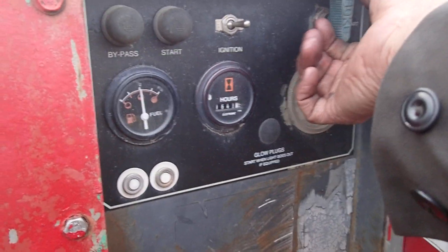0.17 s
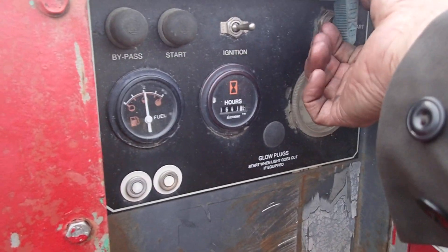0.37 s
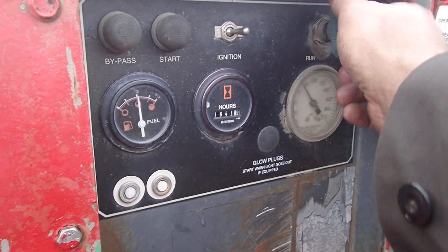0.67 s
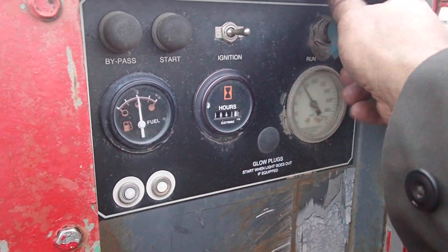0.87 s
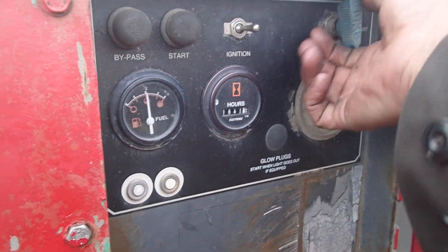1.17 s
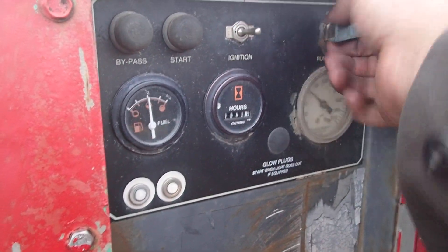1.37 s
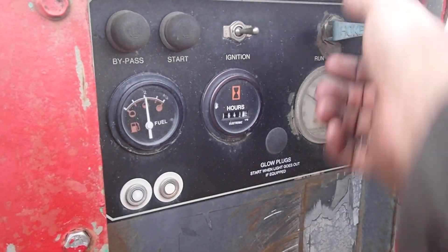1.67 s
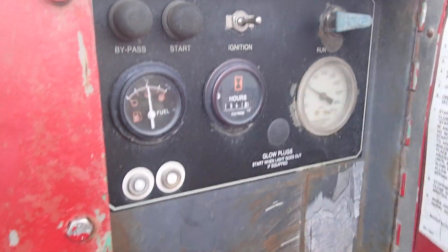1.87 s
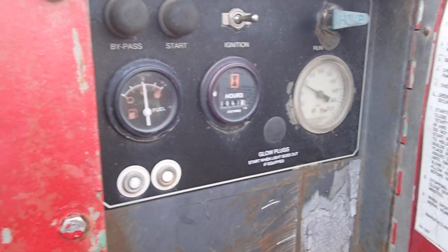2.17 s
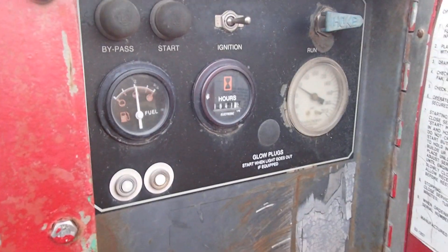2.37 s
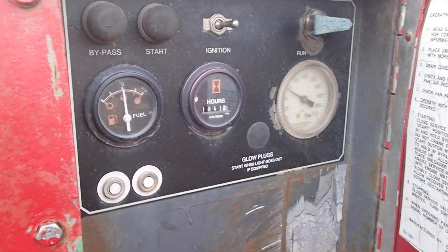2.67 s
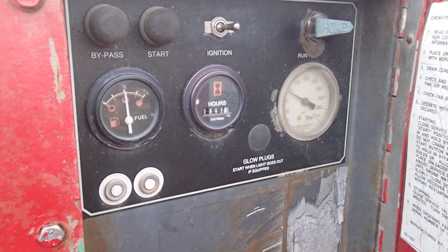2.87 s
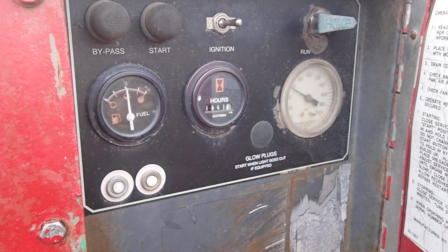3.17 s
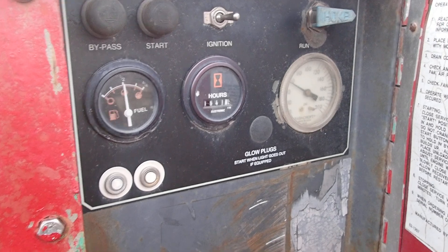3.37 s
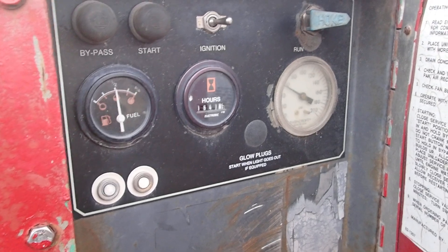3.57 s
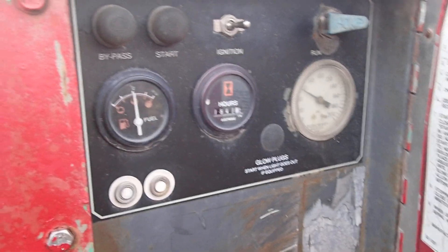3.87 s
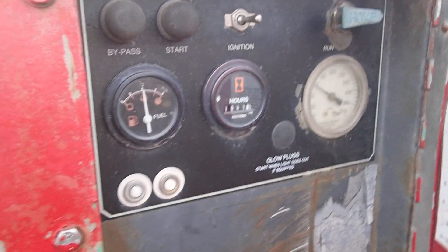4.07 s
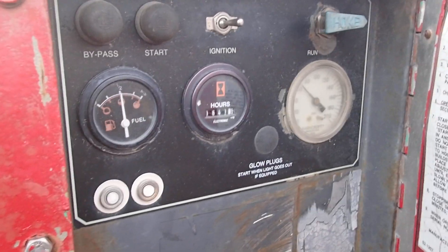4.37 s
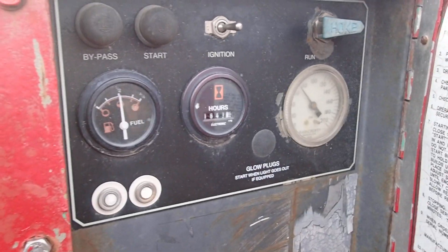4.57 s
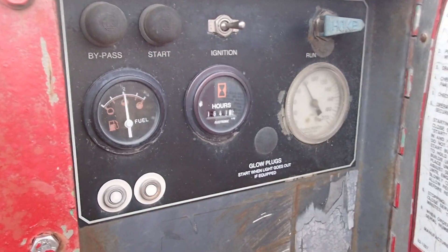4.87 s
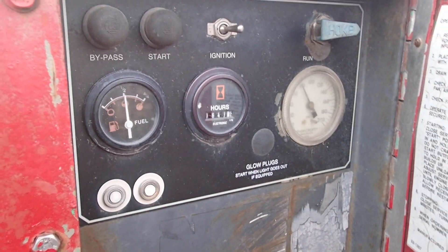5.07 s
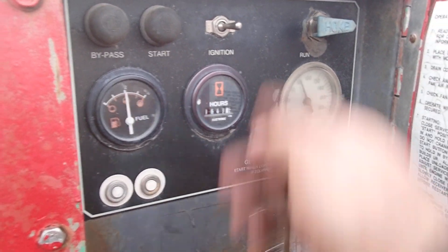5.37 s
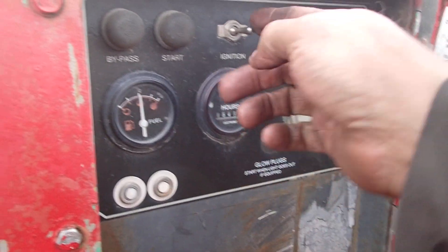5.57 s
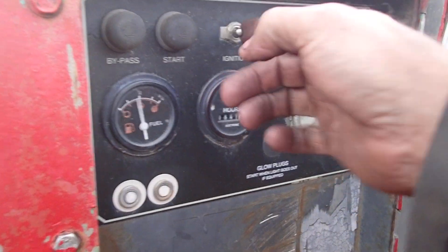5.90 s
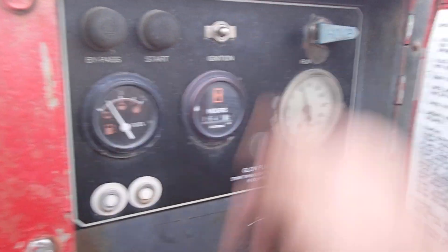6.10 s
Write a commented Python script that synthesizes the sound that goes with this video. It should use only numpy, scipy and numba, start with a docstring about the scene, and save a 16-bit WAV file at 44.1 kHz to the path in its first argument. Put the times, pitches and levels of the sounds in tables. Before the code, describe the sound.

A close, shrill blast of air over a slowing diesel engine stops abruptly, uncovering a clattering idle and a thin leak.

```python
"""A portable diesel compressor blasts air from an open valve, heard close up at its control panel.
The turbulent jet hisses and rings in the panel recess, changing colour as a hand draws back, while the
engine drops from full speed to idle. The valve shuts and the microphone's gain control brings up the
exhaust throb, cylinder clatter, screw whine and a small leak. Then the ignition is switched off and the
engine starts to coast down. The stereo microphone has two ports, the left one muffled."""
import sys
import numpy as np
from scipy import signal
from scipy.fft import rfft, irfft
from scipy.io import wavfile
from scipy.ndimage import uniform_filter1d, minimum_filter1d
from numba import njit

SR = 44100
rng = np.random.default_rng(int(sys.argv[2]) if len(sys.argv) > 2 else 0)


def wav_out(sig):
    """Save sig, one row per channel (or a flat mono array), as 16-bit PCM at SR to the path in sys.argv[1]."""
    wavfile.write(sys.argv[1], SR, np.round(np.clip(np.atleast_2d(sig).T, -1, 1) * 32767).astype(np.int16))


N = 275166
TIME = np.arange(N) / SR
FREQ = np.maximum(np.fft.rfftfreq(N, 1 / SR), 1)
TOP_HZ = 15690  # upper edge of the microphone's band
FULL_HZ, IDLE_HZ = 87, 52.21  # firings per second


def undb(db):
    """Decibels to gain."""
    return 10 ** (np.asarray(db) / 20)


def over_time(points):
    """Points joined by straight lines in time."""
    return np.interp(TIME, *np.transpose(points))


def over_freq(points):
    """Points joined by straight lines on a log-frequency axis."""
    hz, value = np.transpose(points)
    return np.interp(np.log(FREQ), np.log(hz), value)


def ease(start_s, length_s):
    """A smooth step from 0 to 1."""
    u = np.clip((TIME - start_s) / length_s, 0, 1)
    return u * u * (3 - 2 * u)


def bell(hz, width_hz):
    """Power response of one resonance."""
    return 1 / (1 + (2 * (FREQ - hz) / width_hz) ** 2)


def shape(x, gain):
    """Filter with a gain per frequency."""
    return irfft(rfft(x) * gain, N)


def causal(db):
    """Minimum-phase response with the given level per frequency."""
    cepstrum = irfft(np.log(undb(db)), N)
    return np.exp(rfft(cepstrum * (1 + np.sign(np.fft.fftfreq(N)))))


def drift(rate_hz):
    """Smooth random drift of spread 1."""
    x = shape(rng.standard_normal(N), 1 / (1 + (FREQ / rate_hz) ** 2))
    return x / x.std()


def air_noise():
    """White noise of 0 dB per Hz at both microphone ports, less alike towards the treble."""
    # likeness of the two ports: frequency_hz, correlation
    likeness = [(200, 1), (600, .97), (1200, 0.88), (2500, 0.54), (5000, 0.14), (9000, 0.16), (14000, 0.27)]
    alike = over_freq(likeness)
    own, right = rfft(rng.standard_normal((2, N)))
    left = alike * right + np.sqrt(1 - alike ** 2) * own
    return irfft(np.array([left, right]), N) * np.sqrt(SR / 2)


def noise_band(hz, width_hz):
    """Noise through one resonance, about equally strong at any width."""
    return shape(air_noise(), bell(hz, width_hz) / np.sqrt(width_hz))


def scatter(db, decay_s):
    """Response of the direct sound plus a short spray of reflections off the sheet metal."""
    tail = rng.standard_normal(N) * np.exp(-np.minimum(TIME / decay_s, 50))
    return 1 + undb(db) * rfft(tail / np.linalg.norm(tail))


def gusts(length_s=0.011, centre_hz=105, width_hz=60):
    """Short low puffs of stray air on the microphone's right port."""
    # puffs of air: peak_s, level_db
    puffs = [(.12, -19), (.43, -20.5), (.53, -11), (.92, -22)]
    swell = sum(undb(db) * np.exp(-((TIME - s) / length_s) ** 2) for s, db in puffs)
    rumble = shape(rng.standard_normal(N), bell(centre_hz, width_hz))
    return np.array([[0], [1]]) * swell * rumble / rumble.std()


def ignition_switch(start_s=5.922, level_db=-13, decay_s=0.004):
    """A faint, dry snap as the toggle goes over."""
    envelope = (TIME >= start_s) * np.exp(-abs(TIME - start_s) / decay_s)
    return noise_band(hz=6500, width_hz=3500) * undb(level_db) * envelope


def leak(ring_hz=9900, ring_width_hz=190, ring_db=6.5):
    """Escaping air: a thin hiss with a faint high ring, which stays when the valve is shut."""
    # hiss of the leak: frequency_hz, level_db
    spectrum = [(500, -61), (2500, -64.5), (3500, -61.5), (5000, -61.5), (8000, -64.5), (10500, -57.5),
                (13000, -62.5), (15500, -68.5)]
    colour = undb(over_freq(spectrum) + ring_db * bell(ring_hz, ring_width_hz))
    reflections = scatter(db=-10.5, decay_s=0.012)
    return shape(air_noise(), colour * reflections) * undb(0.5 * drift(35))


def shaft_tone(firings, multiple, smear_rad):
    """A tone of rms 1 locked to the crankshaft, its phase wandering a little."""
    phase = 2 * np.pi * (multiple * firings + rng.random())
    return np.sqrt(2) * np.sin(phase + smear_rad * drift(6.9))


def whine(firings, waver_db=2.0):
    """Wavering tones of the turning parts; the screw whine swells and fades three times, then stays low."""
    # tones of the screws, gears and fan: firing_multiple, level_db, swell_share
    tones = [(3.335, -30.5, 0.1), (5.976, -28, 0), (6.77, -31, 0), (8.95, -36, 0), (9.58, -36.5, 0.4),
             (12.04, -36.5, 0.5), (15.11, -28.5, 0.6), (17.05, -36, 0.5), (20.26, -34, 0.3), (24, -32, 0.9),
             (25.26, -38.5, 0.1), (27.04, -39, 0), (30.2, -37.5, 0.5), (33.1, -49, 0), (36.05, -39, 0),
             (42.4, -40.5, 0.3)]
    # swells of the screw whine: time_s, gain_db
    swells = [(2.2, .5), (2.65, 16), (3.3, 2), (3.9, 12), (4.4, 0.5), (4.68, 8), (5.0, -7), (5.5, -5)]
    swell_db = over_time(swells)
    out = 0
    for multiple, db, share in tones:
        gain = undb(db + share * swell_db + waver_db * drift(0.85))
        out += gain * shaft_tone(firings, multiple, smear_rad=0.53)
    return out


def clatter(firings, repeat_share=0.36, knock_depth=0.32, decay_firings=0.23, cylinder_db=0.75):
    """Four cylinders knock in turn; part of the rattle comes back the same in every engine cycle."""
    # diesel clatter in the housing: frequency_hz, level_db
    spectrum = [(30, -79), (70, -52), (120, -43.5), (165, -43), (225, -44), (320, -46.5), (620, -48.5),
                (1060, -48), (1300, -53), (1600, -54), (2200, -62), (3500, -63.5), (8000, -68.5),
                (15000, -92)]
    size = 3380  # points in one engine cycle
    pattern = irfft(np.exp(2j * np.pi * rng.random(size // 2 + 1)))
    cycle = np.interp(firings / 4 % 1 * size, np.arange(size), pattern / pattern.std()) * np.sqrt(SR / 2)
    rattle = np.sqrt(repeat_share) * cycle + np.sqrt(1 - repeat_share) * air_noise()
    knocks = 1 + knock_depth * np.exp(-(firings % 1) / decay_firings)
    beat = knocks * undb(cylinder_db * np.sin(np.pi * firings))  # strong and weak firings alternate
    return shape(rattle * beat / np.sqrt(np.mean(beat ** 2)), undb(over_freq(spectrum)))


def exhaust(firings, firing_hz, burn_db, muffler_hz=115, muffler_db_per_octave=14):
    """The deep throb of the firings through the muffler; it collapses when the fuel is cut."""
    # exhaust and block tones: firing_multiple, level_db, burn_share
    tones = [(1, -23.5, 0.55), (1.751, -28.5, 0.9), (2, -14.5, 1), (2.999, -33, 0)]
    out = 0
    for multiple, db, share in tones:
        muffled_db = muffler_db_per_octave * np.maximum(np.log2(multiple * firing_hz / muffler_hz), 0)
        gain = undb(db + share * burn_db - muffled_db + 0.45 * drift(3.1))
        out += gain * shaft_tone(firings, multiple, smear_rad=0.026)
    return out


def governor(off_s=5.95, coast_hz_per_s=36):
    """Firing rate and fuel cut (0-1): starved of fuel the engine sinks to idle; switched off, it coasts."""
    slowed = ease(start_s=1.33, length_s=0.67)  # the throttle is eased back
    caught = ease(start_s=1.66, length_s=0.45)  # fuel returns as idle nears
    coasted_hz = coast_hz_per_s * np.maximum(TIME - off_s, 0)
    firing_hz = FULL_HZ + (IDLE_HZ - FULL_HZ) * slowed - coasted_hz
    return firing_hz, slowed * (1 - caught) + ease(off_s, length_s=0.16)


def engine():
    """The diesel and the screws it drives: speed and fuel set the throb, whine and clatter."""
    firing_hz, fuel_cut = governor()
    octaves = np.log2(firing_hz / IDLE_HZ)
    firings = np.cumsum(firing_hz * (1 + 0.000987 * drift(2.83))) / SR
    burn_db = 0.56 - 8 * octaves - 17.5 * fuel_cut
    whine_db = 2 + 5 * octaves - 10.5 * fuel_cut
    clatter_db = -0.17 + 11.5 * octaves
    return (exhaust(firings, firing_hz, burn_db)
            + undb(whine_db) * whine(firings)
            + undb(clatter_db) * clatter(firings))


def valve(shut_s, open_db=29, fall_db_per_s=520):
    """Gain of the air flow: steady, then falling fast from the moment of shutting."""
    return undb(open_db - fall_db_per_s * np.maximum(TIME - shut_s, 0))


def ring(hz, width_hz, db, flicker_db=2.1):
    """One narrow, flickering resonance blown by the jet."""
    return noise_band(hz, width_hz) * undb(db + flicker_db * drift(6.0))


def jet(spectrum, recess, echo_gain=0, echo_s=0.00241, flicker_db=1.06):
    """Turbulent hiss coloured by the recess and any echo off its door; each band flickers alone."""
    colour_db = over_freq(spectrum) + sum(db * bell(hz, width) for hz, width, db in recess)
    door = 1 + echo_gain * np.exp(-2j * np.pi * FREQ * echo_s)
    hiss = rfft(air_noise()) * undb(colour_db) * door
    centres_hz, step_hz = np.linspace(0, TOP_HZ, 12, retstep=True)
    bands = (irfft(hiss * np.maximum(1 - abs(FREQ - hz) / step_hz, 0), N) for hz in centres_hz)
    return sum(band * undb(flicker_db * drift(3.8)) for band in bands)


def blast_hiss(hand_left_db=5):
    """The jet's hiss, first shaded by a hand at the panel, then in the clear as it draws back."""
    # the hand's retreat: time_s, clearance (0 near, 1 away)
    hand = [(1.55, 0), (1.8, .5), (2.05, .9), (2.3, 1)]
    # the jet behind the hand and in the clear: frequency_hz, level_db
    shaded_spectrum = [(60, -81), (400, -65.5), (1200, -63.5), (2500, -63), (5000, -57.5), (8000, -60.5),
                       (11000, -59), (14000, -58), (15500, -63.5)]
    clear_spectrum = [(60, -83), (400, -72.5), (1200, -65), (2500, -58.5), (5000, -59), (8000, -61),
                      (11000, -62.5), (14000, -64), (15500, -68)]
    # standing waves in the panel recess, with and without the hand: pitch_hz, width_hz, gain_db
    shaded_recess = [(1667, 40, 6.5), (2590, 120, 2.5), (3065, 47, 5.5), (4485, 320, 13), (4513, 104, -43),
                     (5300, 280, -2.5), (5700, 21, -10), (8380, 260, 4)]
    clear_recess = [(1440, 65, -9.5), (1814, 42, -23.5), (2230, 97, -8), (2470, 41, -17), (2832, 55, -16.5),
                    (3650, 70, -5.5), (3680, 140, 5.5), (4050, 65, -10), (4280, 24, 11.5), (5230, 106, 9),
                    (5880, 70, -2.5), (5940, 44, 10), (7000, 120, 0.5), (6800, 48, 2), (8570, 230, 4),
                    (9500, 210, -3)]
    # the near hand throws some hiss back to the left port
    shaded = jet(shaded_spectrum, shaded_recess) * undb([[hand_left_db], [0]])
    clear = jet(clear_spectrum, clear_recess, echo_gain=0.21)
    away = over_time(hand)
    hiss = np.sqrt(1 - away) * shaded + np.sqrt(away) * clear
    return shape(hiss, scatter(db=-14.5, decay_s=0.016))


def blast(shut_s=4.033, ring_lead_s=0.032):
    """Air from the open valve: hiss, shrill rings and whistles; the hiss is the last to stop."""
    # rings blown by the jet: pitch_hz, width_hz, early_db, late_db
    resonances = [(4484, 100, -32.5, -34.5), (5054, 200, -37.5, -31.5), (5400, 420, -29, -39.5),
                  (7384, 94, -38, -32), (8020, 520, -40, -28.5)]
    # brief whistling flares: peak_s, half_length_s, pitch_hz, width_hz, level_db
    whistles = [(1.76, .03, 8250, 90, -27), (1.949, 0.067, 5790, 60, -26), (2.396, 0.046, 5450, 250, -26),
                (2.9, 0.088, 8240, 90, -32), (3.947, 0.028, 7820, 160, -22)]
    hiss = blast_hiss()
    shift = ease(start_s=1.82, length_s=1.05)  # the weight moves towards the higher rings
    rings = sum(ring(hz, width, early + (late - early) * shift) for hz, width, early, late in resonances)
    flares = sum(ring(hz, width, db) * np.exp(-((TIME - peak_s) / half_s) ** 2)
                 for peak_s, half_s, hz, width, db in whistles)
    return hiss * valve(shut_s) + (rings + flares) * valve(shut_s - ring_lead_s)


def scene():
    """Engine, air and ignition switch as they reach the microphone at the panel."""
    return engine() + blast() + leak() + gusts() + ignition_switch()


@njit
def follow(x, attack, release):
    """Envelope that rises fast and sinks slowly."""
    out, envelope = np.empty(len(x)), x[:2000].max()
    for i in range(len(x)):
        envelope += (x[i] - envelope) * (attack if x[i] > envelope else release)
        out[i] = envelope
    return out


def gain_control(ports, target_db=-8.0, attack_s=0.025, hold_s=0.016, release_s=0.068):
    """One gain for both ports keeps the right one level, letting go only after a short wait."""
    power = np.maximum(uniform_filter1d(ports[1] ** 2, size=128), 1e-12)
    half = int(hold_s * SR / 2)
    held = -minimum_filter1d(-np.sqrt(power), 2 * half + 1, origin=half)  # highest recent rms
    return ports * undb(target_db) / follow(held, 1 / (attack_s * SR), 1 / (release_s * SR))


def limit(ports, ceiling_db=-0.2, window_samples=129):
    """Ducks for a few milliseconds around each peak that would overload."""
    peak = np.maximum(abs(ports).max(axis=0), 1e-9)
    gain = np.minimum(undb(ceiling_db) / peak, 1)
    return ports * uniform_filter1d(minimum_filter1d(gain, window_samples), window_samples)


def record(dry, left_lag_s=4 / SR):
    """Two microphone ports, the left muffled and late, then gain control, limiter and treble cut-off."""
    # colour of both ports: frequency_hz, gain_db
    port_colour = [(15, -19), (50, -3), (2300, -1), (3000, 2), (3750, -2), (4030, -4.5), (4450, 6),
                   (5300, 8), (6600, 5), (7800, 8), (8500, 3), (9250, -5), (11500, -3.5), (14000, 1)]
    # muffling of the left port against the right: frequency_hz, gain_db
    left_muffling = [(50, 0.5), (104, -4.5), (300, -12.5), (550, -18), (1100, -24), (2000, -28.5),
                     (3000, -24), (4100, -36), (5000, -34.5), (6100, -12), (7000, -16), (8400, -14),
                     (10000, -25), (14500, -35)]
    left = causal(over_freq(left_muffling)) * np.exp(-2j * np.pi * FREQ * left_lag_s)
    ports = shape(dry, undb(over_freq(port_colour)) * np.array([left, np.ones(len(FREQ))]))
    lowpass = signal.ellip(14, 0.1, 80, TOP_HZ, fs=SR, output="sos")
    return signal.sosfilt(lowpass, limit(gain_control(ports)))


dry = scene()
out = record(dry)
wav_out(out)
```